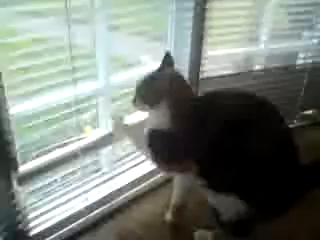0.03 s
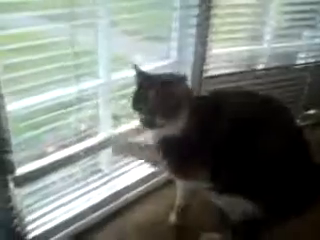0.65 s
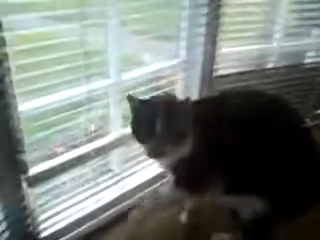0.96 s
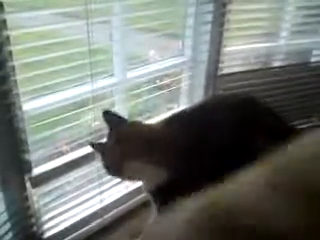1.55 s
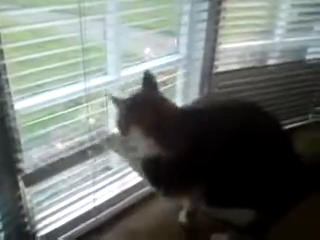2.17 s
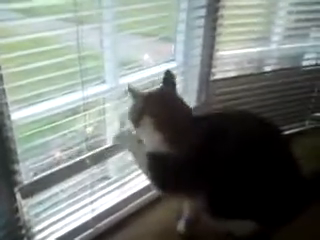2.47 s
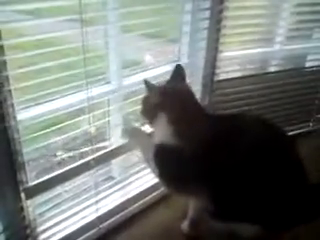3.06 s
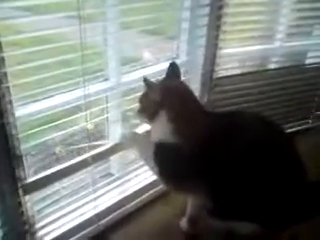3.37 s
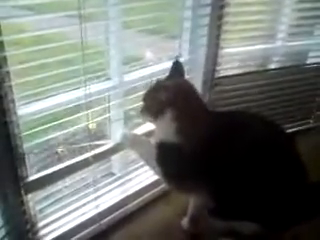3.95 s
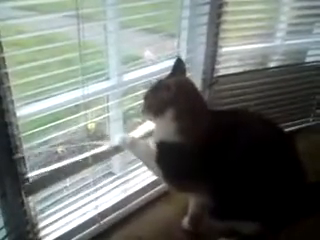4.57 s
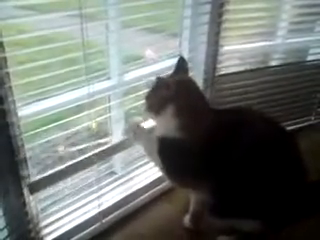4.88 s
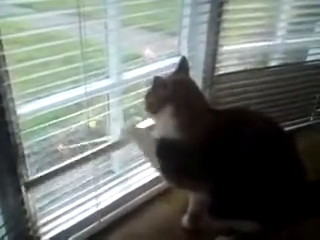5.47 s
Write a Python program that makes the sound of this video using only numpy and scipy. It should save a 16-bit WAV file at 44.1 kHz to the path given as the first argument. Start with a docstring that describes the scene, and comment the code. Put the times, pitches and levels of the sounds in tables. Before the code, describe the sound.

Window blind slats scrape softly under a cat's paw and snap back with bright clacks that ring for a moment. After a couple of snaps at the start come light ticking and rustling, a single clack, and a lull. Several sharp clacks close together finish it. A low rumble and electrical hum fill the quiet room, and the stereo sound of the blind leans slightly right.

```python
"""Bright clacks with a short ring: a cat paws at a slatted window blind in a quiet room.
The paw drags along the slats, which scrape and tick, until one slips free and snaps back against its
neighbours. A loose slat rattles to rest. The window recess scatters each clack on its way to a
stereo pair of microphones, and a low mains hum and rumble fill the room behind."""
import sys
import numpy as np
from scipy import signal
from scipy.fft import rfft, irfft, next_fast_len
from scipy.io import wavfile
from scipy.ndimage import uniform_filter1d

SR = 44100
rng = np.random.default_rng(int(sys.argv[2]) if len(sys.argv) > 2 else 0)


def write(x):
    x = np.atleast_2d(x).T
    wavfile.write(sys.argv[1], SR, np.round(np.clip(x, -1, 1) * 32767).astype(np.int16))


N = 252252
HIT_TIME_S = np.arange(int(.5 * SR)) / SR

# low bending modes of a slat: pitch_ratio, level_db, t60_s
SLAT_MODES = [(1, 9.5, 0.5), (.968, -3, 0.58), (1.078, 5, 0.21)]
# colour of sliding and of light touches: frequency_hz, gain_db
SCRAPE_COLOUR = [(200, -19), (800, -5), (1200, -6.5), (2800, -7), (5000, -2), (8300, -0.5), (10500, -4.5),
                 (13800, -4.5)]
# width of the blind between the microphones: frequency_hz, side_minus_mid_db
BLIND_WIDTH = [(150, -16), (690, -20.5), (1270, -0.5), (2500, 0), (6000, 1.5), (12000, 0.5)]


def slat_snaps(crack_db=-2, modes_db=-4.5, zing_db=-17, blind_db=-18, scatter_db=-9, rise_s=0.0028):
    """Each slat freed from the paw cracks against its neighbours, and the crack sets its modes ringing."""
    # slats snapping back: start_s, level_db, relative_ring_db, pitch_hz, treble_db
    snaps = [(0.0862, -29.5, -10.5, 1149, -6.5), (0.1142, -36, -23, 1156, -2),
             (0.4355, -19.5, -18.5, 1150, 3.3), (0.4601, -33.5, -18, 1143, -8.5),
             (2.857, -24.5, -18.2, 1147, -4), (4.637, -25.5, -23.5, 1165, -2.5),
             (4.853, -20, -22.5, 1157, 3), (5.102, -20, -16, 1116, 2), (5.395, -26, -20.5, 1155, -5),
             (5.642, -20.5, -17.5, 1143, 2)]
    # colour of a clack: frequency_hz, gain_db
    clack_colour = [(120, -16.5), (400, -15.5), (900, -17), (1200, -2.5), (1600, -6.5), (2200, -5),
                    (3900, -8.5), (4600, -3.5), (5600, -3.5), (8200, 2), (9200, -4), (10300, -6.5),
                    (13800, -9)]
    # high modes of the slat edge: pitch_hz, level_db, t60_s
    edge_modes = [(4700, -7, .035), (4865, 0, .045), (4960, -5, .05)]
    # resonances of the whole blind: pitch_hz, level_db, t60_s
    blind_modes = [(3180, 2, 0.18), (3570, 4, 0.02), (5400, 5, 0.045), (6120, -2, 0.041),
                   (6840, -14, 0.046), (8400, -13, 0.076), (9070, 10, 0.068), (9000, -25, 0.04),
                   (9550, 5, 0.044)]
    medium_db, medium_t60, chatter_slope = -27.5, 0.023, 0.44  # a louder snap chatters longer
    body_slope, zing_slope = -0.91, -1.3  # dB per dB of treble: a brighter snap has less of both
    out = np.zeros((2, N))
    for start_s, db, ring_db, pitch_hz, treble_db in snaps:
        chatter_t60 = medium_t60 * undb(chatter_slope * (db - medium_db))
        hit = slat_strike(chatter_t60) * np.minimum(HIT_TIME_S / rise_s, 1)
        tilt = [(3000, body_slope * treble_db), (6000, 0), (8000, 0.021), (11000, treble_db)]
        crack = colour(colour(hit, clack_colour), tilt)
        release = signal.unit_impulse(len(HIT_TIME_S))
        chatter = undb(scatter_db) * hit / np.linalg.norm(hit[0])
        ring = slat_ring(release + chatter, pitch_hz)
        sway_db = 3.8 * walk(65.6)[:len(HIT_TIME_S)]  # the swaying slat rings unevenly
        parts = [(uneven_treble(crack, spread_db=3), crack_db),
                 (ring * undb(sway_db), ring_db + modes_db),
                 (resonate(hit, edge_modes), zing_db + zing_slope * treble_db),
                 (resonate(hit, blind_modes), blind_db)]
        add(out, start_s, sum(level(part, db + part_db, size=SR // 20) for part, part_db in parts))
    return out


def slat_strike(chatter_t60, slat_t60=0.095, recess_t60=0.23, recess_db=-10, room_t60=0.21, room_db=-26):
    """A flurry of contacts shakes the slat; window recess and room scatter it into a duller tail."""
    flurry = fade(chatter_t60) ** 2

    def wash(decay):
        """Dense noise whose energy builds up during the flurry and then dies away."""
        energy = np.abs(signal.fftconvolve(flurry, decay ** 2)[:len(HIT_TIME_S)])
        return stereo_noise(BLIND_WIDTH, len(HIT_TIME_S)) * np.sqrt(energy)

    grit = np.exp(0.36 * walk(753)[:len(HIT_TIME_S)])
    tail = wash(undb(recess_db) * fade(recess_t60) + undb(room_db) * fade(room_t60))
    direct = wash(fade(slat_t60)) * grit
    return direct + colour(tail, [(6000, 0.0029), (12000, -3)])


def slat_ring(drive, pitch_hz):
    """A shaken slat bends and rings in a cluster of modes around its pitch."""
    return resonate(drive, [(pitch_hz * ratio, db, t60) for ratio, db, t60 in SLAT_MODES])


def uneven_treble(x, spread_db, spacing_hz=211.4):
    """Random peaks and dips in the treble give a clack, tick or scrape an uneven colour."""
    hz = 1600 + spacing_hz * np.arange(64)
    gain_db = spread_db * rng.standard_normal(len(hz)) * (hz > hz[0])
    return colour(x, np.transpose([hz, gain_db]))


def slat_ticks(chatter_t60=0.016, damp_t60=1.0, length_slope=-2.2, top_slope=-0.75):
    """Light touches of slat on slat, damped by the paw; a fuller knock is shorter and duller."""
    # slats touching: start_s, level_db, body_db
    touches = [(0.8638, -47.5, 3), (1.921, -54.5, 4), (1.931, -60, 9), (2.244, -55, -5), (2.41, -51.5, 0.5),
               (2.477, -54.5, -2), (2.637, -42.5, -3.5), (2.778, -44.5, -3.5), (3.034, -49.5, 0),
               (3.325, -51.5, 6), (4.2528, -58.5, 8), (4.2795, -56.5, 3.5), (4.736, -48, -0.5),
               (5.577, -54, 4)]
    out = np.zeros((2, N))
    for start_s, db, body_db in touches + loose_slat_bounces():
        fullness_db = max(body_db, 0)
        shortening = undb(length_slope * fullness_db)
        hit = slat_strike(chatter_t60 * shortening) * fade(damp_t60 * shortening)
        tilt = [(3000, body_db), (7500, 0), (12000, top_slope * fullness_db)]
        tick = colour(colour(hit, SCRAPE_COLOUR), tilt)
        add(out, start_s, level(uneven_treble(tick, spread_db=3), db, size=SR // 50))
    return out


def loose_slat_bounces(start_s=.526, first_db=-41, loss_db=6, gap_s=0.038, gap_kept=.88, body_db=0.5):
    """A loose slat bounces to rest, each time sooner and weaker. Rows: start_s, level_db, body_db."""
    gaps = gap_s * gap_kept ** np.arange(4)
    starts = start_s + np.cumsum(gaps) - gaps
    return [(s, first_db - loss_db * bounce, body_db) for bounce, s in enumerate(starts)]


def paw_scrape(grain=0.098, flutter_db=0.5, ring_db=-15):
    """The sliding paw makes a dense run of tiny slips, which also keeps the slat faintly ringing."""
    slips = stereo_noise(BLIND_WIDTH, N) * np.exp(grain * walk(760))
    friction = uneven_treble(colour(slips, SCRAPE_COLOUR), spread_db=1)
    scrape = level(friction, 0) * paw_pressure() * undb(flutter_db * walk(60))
    ring = slat_ring(scrape, pitch_hz=1160)
    return scrape + level(ring, ring_db) * np.std(scrape)


def paw_pressure(grip_s=0.015, press_db_per_s=31, release_db_per_s=241, resting_db=-72):
    """Each stroke grips, presses harder as the slat bends, and lets go; at rest the blind barely stirs."""
    # strokes along the slats: start_s, length_s, peak_db
    strokes = [(0.15, 0.29, -51.5), (0.493, .14, -51), (0.735, 0.017, -57), (2.156, 0.092, -53.5),
               (2.236, 0.038, -47), (2.298, 0.022, -54), (2.34, 0.051, -51.5), (2.622, 0.025, -48.5),
               (2.689, 0.14, -53.5), (2.934, .14, -53), (3.163, 0.18, -52.5), (3.784, 0.019, -54),
               (4.78, 0.061, -51.5), (5.241, 0.017, -49.5), (5.307, 0.18, -51.5), (5.542, 0.19, -47)]
    t = np.arange(N) / SR
    pressure = undb(resting_db)
    for start_s, length_s, peak_db in strokes:
        grip = np.clip((t - start_s) / grip_s, 0, 1)
        past_end_s = t - start_s - length_s
        shape_db = np.minimum(press_db_per_s * past_end_s, -release_db_per_s * past_end_s)
        pressure = np.hypot(pressure, grip * undb(peak_db + shape_db))
    return pressure


def room_tone(noise_db=-48.5, waver_db=2.5, drift_rad=0.26):
    """The room behind the blind: low rumble, thin hiss and a slightly wavering mains hum."""
    # rumble and hiss: frequency_hz, gain_db
    room_colour = [(10, -22), (20, -4.5), (37, 0), (53, -7.5), (70, -6), (90, -4), (125, -8), (175, -19.5),
                   (265, -21), (320, -25.5), (800, -35), (2000, -41.5), (5000, -45), (13500, -43.5)]
    # width of the room between the microphones: frequency_hz, side_minus_mid_db
    room_width = [(30, -13), (90, -19), (170, -8.5), (400, -3), (1500, -1), (6000, 0)]
    # hum lines: pitch_hz, rms_db
    hum_lines = [(36.3, -61.5), (87, -61.5), (99.8, -51), (125, -65), (200, -85)]
    out = level(colour(stereo_noise(room_width, N), room_colour), noise_db)
    t = np.arange(N) / SR
    for hz, db in hum_lines:
        tone = np.sin(2 * np.pi * hz * t + drift_rad * walk(4.05))
        out += level(tone * undb(waver_db * walk(4.6)), db)
    return out


def undb(db):
    """Decibels as an amplitude ratio."""
    return 10 ** (np.asarray(db) / 20)


def fade(t60):
    """Exponential decay over the length of one hit."""
    return undb(-60 * HIT_TIME_S / max(t60, 1e-3))


def level(x, db, size=None):
    """Scale x so that its first `size` samples have an rms of db."""
    return x * undb(db) / np.sqrt(np.mean(x[..., :size] ** 2))


def colour(x, points):
    """Causal filter through points (frequency_hz, gain_db), built from the cepstrum."""
    size = 2 * next_fast_len(x.shape[-1] // 2 + 2048)
    hz, db = np.transpose(points)
    log_hz = np.log(np.arange(size // 2 + 1) * SR / size + 1)
    gain = undb(np.interp(log_hz, np.log(hz), db))
    cepstrum = irfft(np.log(gain))
    cepstrum[1:size // 2] *= 2
    cepstrum[size // 2 + 1:] = 0
    return irfft(rfft(x, size) * np.exp(rfft(cepstrum)))[..., :x.shape[-1]]


def stereo_noise(width, size):
    """Left and right noise whose side signal is coloured by `width`."""
    mid, side = rng.standard_normal((2, size))
    side = colour(side, width)
    return np.array([mid + side, mid - side])


def walk(rate_hz):
    """Random steps at rate_hz, smoothed twice, with an rms of 1."""
    hold = int(SR / rate_hz)
    steps = np.repeat(rng.standard_normal(N // hold + 1), hold)
    return level(uniform_filter1d(uniform_filter1d(steps, hold), hold)[:N], 0)


def resonate(x, modes):
    """Decaying modes (pitch_hz, level_db, t60_s) driven by x."""
    out = 0
    for hz, db, t60 in modes:
        pole = np.exp((2j * np.pi * hz - np.log(1000) / t60) / SR)
        feedback = np.poly([pole, pole.conjugate()]).real
        out = out + level(signal.lfilter([1, 0, -1], feedback, x), db)
    return out


def add(out, start_s, sound):
    """Mix a sound in at start_s."""
    start = int(start_s * SR)
    out[:, start:start + sound.shape[1]] += sound[:, :N - start]


def scene():
    """The blind over the room tone; its treble reaches the right microphone more strongly."""
    # balance of the blind: frequency_hz, left_minus_right_db
    balance = [(350, -1), (700, 5), (1270, 1), (2330, 0), (4300, -5), (7900, -3.5), (13500, -.5)]
    blind = slat_snaps() + slat_ticks() + paw_scrape()
    left = colour(blind[0], [(hz, db / 2) for hz, db in balance])
    right = colour(blind[1], [(hz, -db / 2) for hz, db in balance])
    return np.array([left, right]) + room_tone()


def record(dry):
    """The microphones open after a moment, and the top is cut steeply."""
    open_s, fade_in_s, top_hz = .081, .01, 13950
    opened = np.clip((np.arange(N) / SR - open_s) / fade_in_s, 0, 1)
    lowpass = signal.ellip(10, .2, 70, top_hz, fs=SR, output="sos")
    return signal.sosfilt(lowpass, dry * opened)


dry = scene()
out = record(dry)
write(out)
```